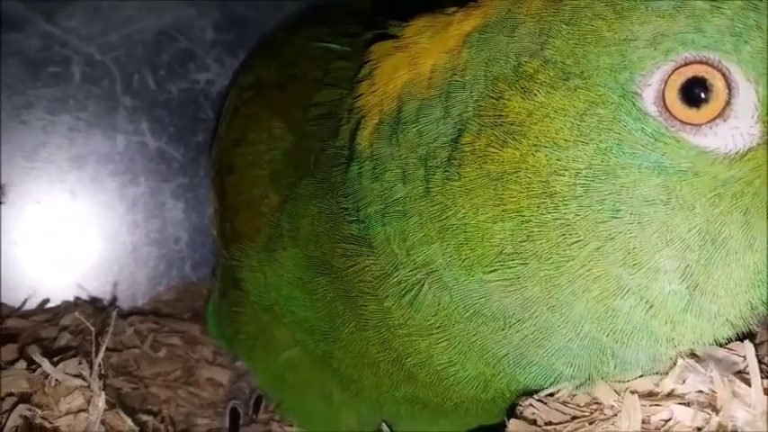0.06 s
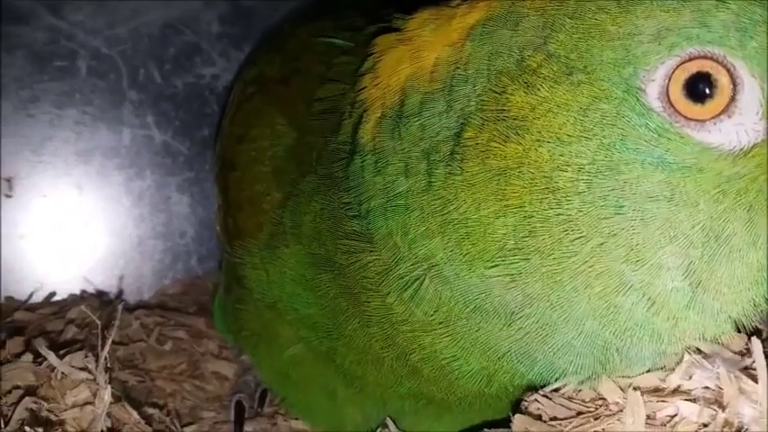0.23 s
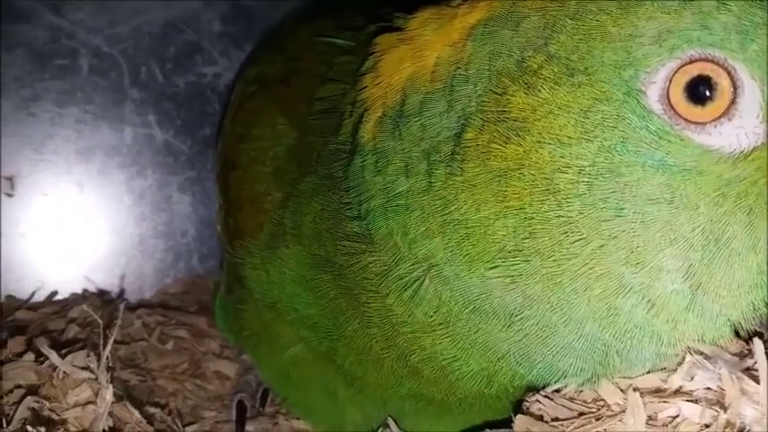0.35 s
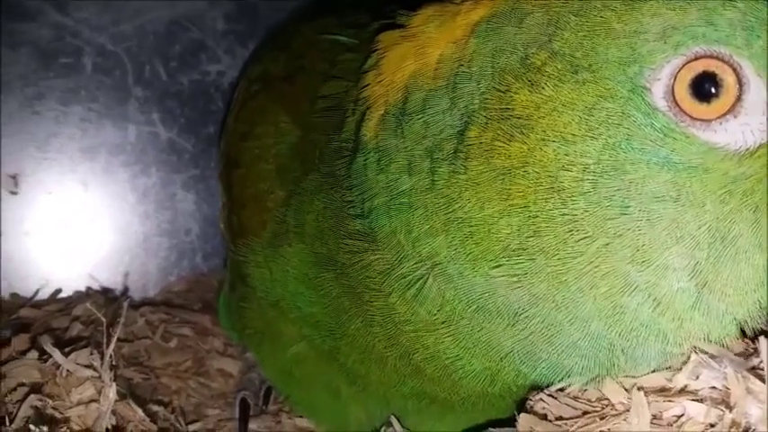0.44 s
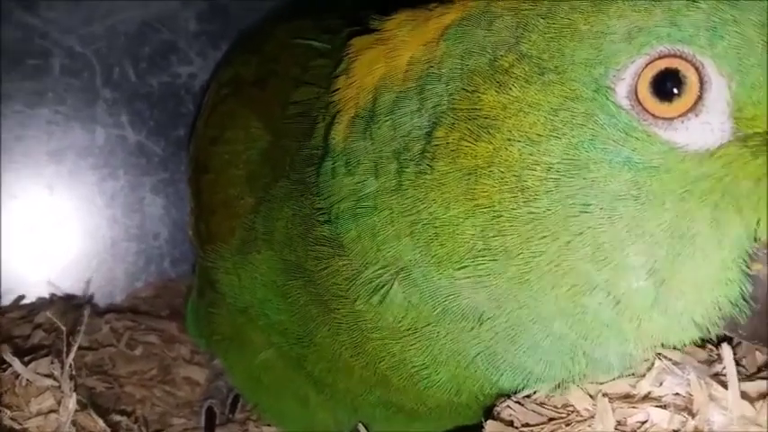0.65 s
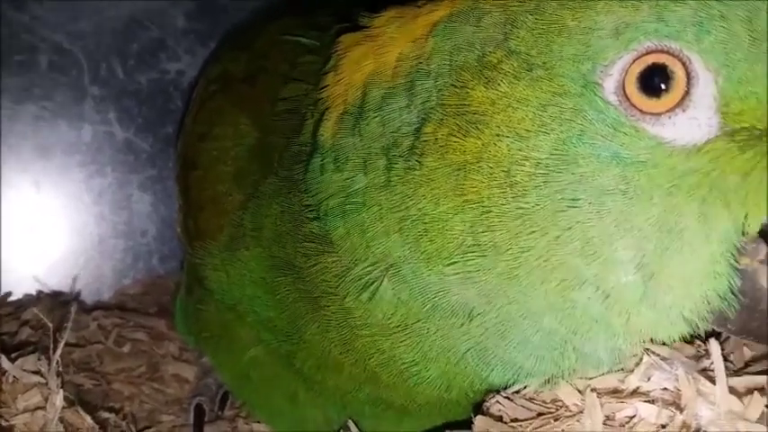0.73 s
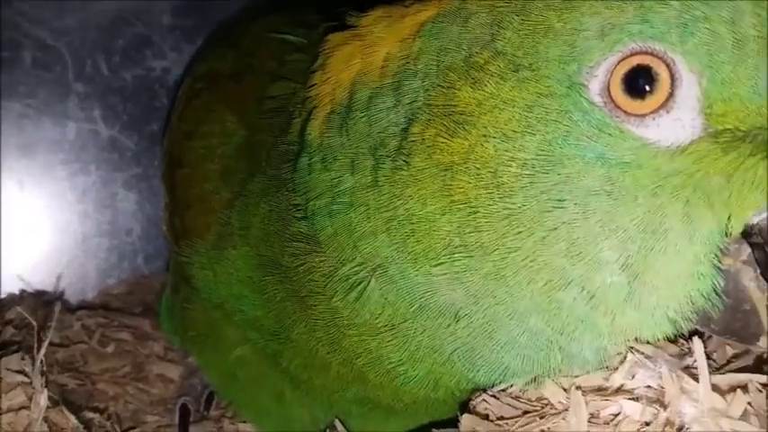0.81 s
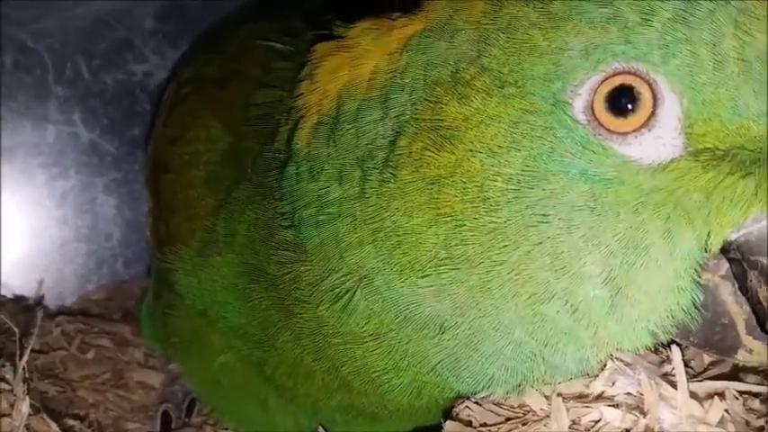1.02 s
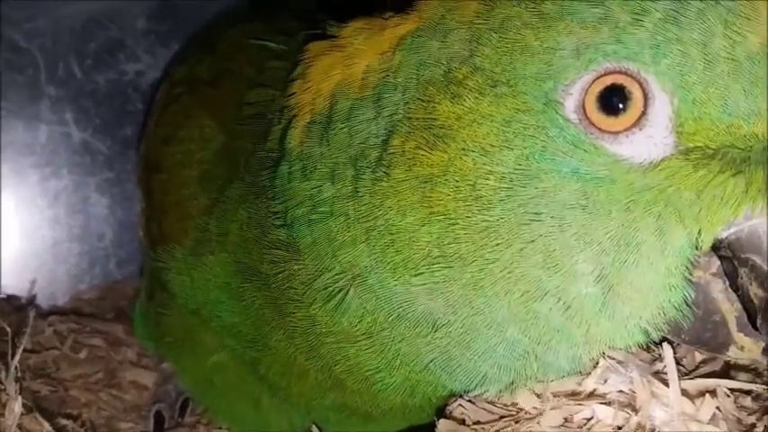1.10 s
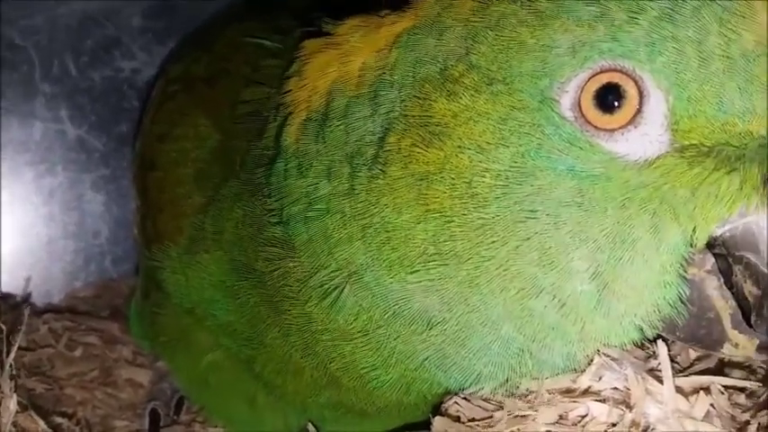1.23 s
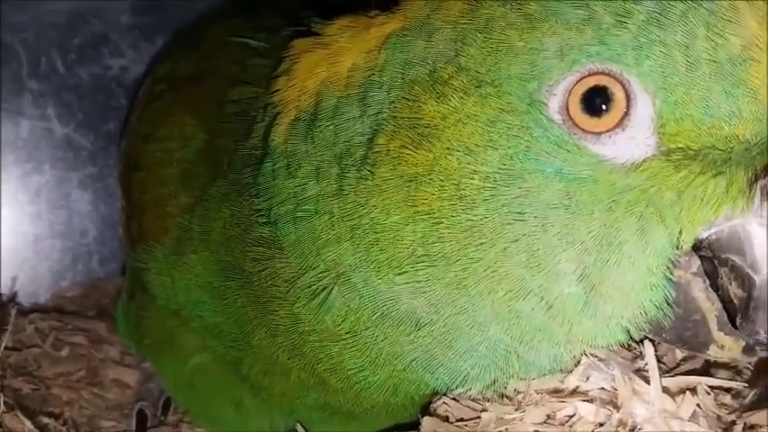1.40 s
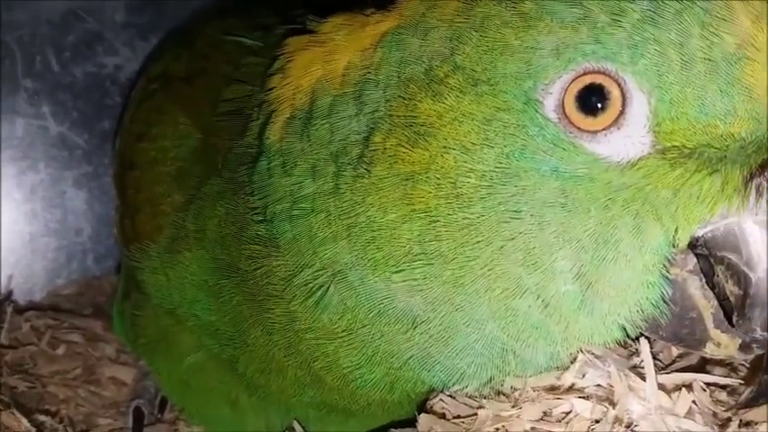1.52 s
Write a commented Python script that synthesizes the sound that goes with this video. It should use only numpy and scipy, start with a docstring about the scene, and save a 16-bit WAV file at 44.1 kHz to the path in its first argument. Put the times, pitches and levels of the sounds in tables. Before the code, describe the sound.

A parrot gives a short, rough, fluttering growl, then a puff and a rising wheezy breath.

```python
"""Parrot growling in a nest box

Close up, single throat pops run together into a fluttering, rough buzz: pulses from the syrinx
ring the bird's resonances and its small box. The growl ends in a puff of air, then the bird draws
a hissing breath and its narrowed airway whistles a rising wheeze.
The bedding ticks and rustles faintly over a low, wavering hum."""
import sys
import numpy as np
from scipy import signal
from scipy.fft import rfft, irfft, next_fast_len
from scipy.io import wavfile
from scipy.ndimage import map_coordinates

SR = 44100
rng = np.random.default_rng(int(sys.argv[2]) if len(sys.argv) > 2 else 0)


def persist_wave(psi):
    """Save psi, clipped to +-1, as 16-bit WAV."""
    counts = np.round(np.clip(psi, -1, 1) * 32767).astype(np.int16)
    wavfile.write(sys.argv[1], SR, np.atleast_2d(counts).T)


N = 68355

# Pan of the ambience and of the outgoing air. Each row: frequency in Hz, left over right in dB.
ROOM_PAN = [(100, 6.5), (600, -1), (2000, -9), (7000, 6), (13000, -1.5)]
PUFF_PAN = [(400, -3.5), (1000, -1), (2200, -5.5), (4000, 0), (8000, 3)]
# Stereo width of the ambience. Each row: frequency in Hz, left-right correlation.
ROOM_CORRELATION = [(100, 0.94), (600, 0.59), (2000, 0.17), (6000, 0.12)]
INHALE_LAG_S = .00027


def amp(db):
    """Decibels to gain."""
    return 10 ** (np.asarray(db) / 20)


def unit(x):
    """Scale to rms 1."""
    return x / np.sqrt(np.mean(x ** 2) + 1e-20)


def along(points, hz):
    """Read (Hz, value) points on a log frequency axis."""
    freqs, values = np.transpose(points)
    return np.interp(np.log(hz + 1), np.log(freqs + 1), values)


def clock():
    """Time of every sample in seconds."""
    return np.arange(N) / SR


def curves(rows):
    """An automation curve for each column after the time."""
    times, *columns = np.transpose(rows)
    return [np.interp(clock(), times, column) for column in columns]


def wobble(rate):
    """A smooth random curve with `rate` knots a second."""
    return map_coordinates(rng.standard_normal(int(N * rate / SR) + 4), [clock() * rate])


def filtered(x, response):
    """Filter x by a complex function of frequency."""
    size = 2 * next_fast_len(N)
    return irfft(rfft(x, size) * response(np.fft.rfftfreq(size, 1 / SR)), size)[..., :N]


def causal(points, hz):
    """Minimum-phase EQ response through (Hz, dB) points."""
    cepstrum = irfft(np.log(amp(along(points, hz))))
    half = len(cepstrum) // 2
    cepstrum[1:half] *= 2
    cepstrum[half + 1:] = 0
    return np.exp(rfft(cepstrum))


def resonate(x, modes, eq):
    """Ring parallel resonances of alternating polarity, then apply an EQ."""
    def response(f):
        bank = sum((-1) ** k * amp(db) * 1j * f * width / (hz * hz - f * f + 1j * f * width)
                   for k, (hz, width, db) in enumerate(modes))
        return bank * causal(eq, f)
    return filtered(x, response)


def place(x, pan, lag_s=0):
    """Pan by frequency, the left channel lag_s behind the right."""
    half = np.array([[.5], [-.5]])
    return filtered(x, lambda hz: amp(half * along(pan, hz)) * np.exp(-2j * np.pi * hz * half * lag_s))


def rush(colour, correlation):
    """Coloured stereo noise of rms 1, its width set by frequency."""
    def response(hz):
        angle = np.arccos(np.clip(along(correlation, hz), -1, 1)) / 2
        return amp(along(colour, hz)) * [np.cos(angle), np.sin(angle)]
    mid, side = filtered(rng.standard_normal((2, N)), response)
    return unit(np.array([mid + side, mid - side]))


def pulses(times, sizes):
    """Sharp windowed-sinc pulses, timed between samples."""
    at = np.asarray(times)[:, None] * SR
    taps = np.floor(at).astype(int) + np.arange(-7, 9)
    shapes = np.sinc(taps - at) * np.sinc((taps - at) / 8) * np.asarray(sizes)[:, None]
    return np.bincount(np.clip(taps, 0, N - 1).ravel(), shapes.ravel(), N)


def background():
    """A low hum wavers over a quiet bed of noise."""
    # Course of the hum. Each row: time in seconds, pitch in Hz, level in dB.
    course = [(0.0, 109.4, -35), (0.232, 108.4, -40.5), (0.378, 120.2, -60), (0.426, 116.4, -43.5),
              (0.482, 110.4, -42), (0.742, 111.7, -37), (1.056, 111.9, -43), (1.164, 120, -45),
              (1.194, 115.1, -54.5), (1.442, 116.8, -43.5), (1.506, 108.1, -69), (1.55, 107.7, -39)]
    # Its partials. Each row: harmonic number, relative level in dB.
    partials = [(1, -1), (2, -23.5)]
    # Colour of the noise bed. Each row: frequency in Hz, relative level in dB.
    bed_colour = [(25, -18), (55, -4), (85, 8), (140, 9), (220, 0), (750, -3.5), (1150, -16), (2100, -17),
                  (3800, -40), (15000, -37)]
    hz, db = curves(course)
    phase = 2 * np.pi * np.cumsum(hz) / SR
    hum = np.sqrt(2) * amp(db) * sum(amp(level) * np.sin(k * phase) for k, level in partials)
    bed = amp(-48) * rush(bed_colour, ROOM_CORRELATION)
    return place(hum, pan=[(1, 4.5)]) + place(bed, ROOM_PAN)


def bedding():
    """Wood chips tick and rustle under the bird."""
    # Chip ticks. Each row: start in seconds, level in dB, left over right in dB.
    ticks = [(1.2947, -37, 5), (1.3301, -49, 4), (1.3601, -50, 4), (1.3635, -53, 4), (1.3875, -53, 4),
             (1.395, -56, 4), (1.4514, -48, 4), (1.483, -55, 3)]
    # Soft shifts of the chips. Each row: centre in seconds, half width in seconds, level in dB.
    shifts = [(0.801, 0.05, -67), (1.259, 0.04, -58.5), (1.5, 0.082, -68)]
    # Colours of both. Each row: frequency in Hz, relative level in dB.
    tick_colour = [(1000, -33), (4000, -9), (7000, -13.5), (10000, -16.5), (13000, -11), (15500, -4.5)]
    rustle_colour = [(2000, -8), (5000, -2.5), (7500, -3), (10000, -16.5), (13000, -8.5), (15500, -6.5)]
    t60_s, grain_db = .005, 2.5
    t = clock()
    half = np.array([[.5], [-.5]])
    decays = sum(amp(db + half * pan - 60 * np.abs(t - start) / t60_s) * (t >= start)
                 for start, db, pan in ticks)
    swells = sum(amp(db) * np.exp(-((t - centre) / width) ** 2) for centre, width, db in shifts)
    grains = unit(amp(grain_db * wobble(rate=400)) * rush(rustle_colour, ROOM_CORRELATION))
    return decays * rush(tick_colour, ROOM_CORRELATION) + place(swells * grains, ROOM_PAN)


def breath():
    """Air rushes through the parrot's throat and beak, out and in."""
    # Airflow of a fading breath, the puff, the inhale and the start of the next breath.
    # Each row: time in seconds, level in dB.
    first_flow = [(0, -38.5), (.055, -42.5), (.10, -55.5), (.2, -66), (.25, -100)]
    puff_flow = [(.33, -76), (.39, -55), (.48, -43), (.55, -35.5), (.595, -34.5), (.63, -38.5),
                 (.67, -47.5), (.73, -58.5), (.85, -75)]
    inhale_flow = [(.86, -80), (.93, -58), (.98, -52), (1.08, -45), (1.15, -39.5), (1.19, -42),
                   (1.235, -34.5), (1.27, -41), (1.30, -48), (1.42, -97)]
    last_flow = [(1.38, -86), (1.42, -100), (1.48, -63), (1.55, -49)]
    # Colours of the air. Each row: frequency in Hz, relative level in dB.
    soft_colour = [(200, -36), (400, -7), (750, 4.5), (1100, -5), (1700, -5.5), (2500, -21.5), (4300, -35),
                   (12000, -62)]
    puff_colour = [(200, -2), (400, -6.5), (700, 3), (1100, -1.5), (1750, -3.5), (2140, -3), (2400, -6),
                   (3100, -12), (3800, -10.5), (4400, -27.5), (6500, -27.5), (8000, -26), (11000, -47.5),
                   (15000, -50.5)]
    inhale_colour = [(250, -41), (400, -17), (520, 3.5), (750, 0.5), (1050, 1.5), (1270, -6.5), (1600, 2),
                     (2000, -9.5), (2400, -15.5), (3400, -8.5), (4500, -24), (5500, -43.5), (10000, -67.5),
                     (15000, -50.5)]
    # Stereo width of the air. Each row: frequency in Hz, left-right correlation.
    correlation = [(300, 1), (900, 0.81), (2000, 0)]
    # Pan of the inhale. Each row: frequency in Hz, left over right in dB.
    inhale_pan = [(300, -10.5), (600, 11), (1020, -4.5), (1790, -4.5), (3150, -2), (4500, 4)]
    flow = lambda rows: amp(curves(rows)[0])
    puff = flow(puff_flow) * rush(puff_colour, correlation)
    inhale = flow(inhale_flow) * rush(inhale_colour, correlation)
    soft = (flow(first_flow) + flow(last_flow)) * rush(soft_colour, correlation)
    return place(puff + soft, PUFF_PAN) + place(inhale, inhale_pan, INHALE_LAG_S)


def wheeze():
    """The narrowed airway whistles, reedy as it rises, purer on a faltering held note."""
    # The whistle. Each row: time in seconds, pitch in Hz, fundamental in dB, overtones in dB.
    course = [(.92, 400, -62, -66), (.98, 443, -49, -37), (1.005, 480, -55, -47), (1.025, 502, -42, -39),
              (1.066, 532, -43, -35), (1.074, 600, -53, -50), (1.084, 680, -42, -44),
              (1.113, 730, -44, -33), (1.138, 745, -52, -42), (1.149, 760, -33, -39),
              (1.165, 772, -46, -38), (1.183, 784, -30, -33), (1.208, 794, -29, -42), (1.23, 792, -45, -44),
              (1.25, 780, -32, -35), (1.273, 792, -30, -39), (1.286, 790, -42, -40), (1.308, 780, -48, -44),
              (1.335, 785, -55, -66), (1.40, 785, -64, -85)]
    # Trim of each partial in dB, from the fundamental up.
    trims = [-.5, -12.5, -16, -22.5, -27]
    # Colour of the beak. Each row: frequency in Hz, gain in dB.
    beak_eq = [(700, 1), (1200, -6), (1550, 1), (3200, -3)]
    flicker_db, fuzz_rad = 2, .42
    t = clock()
    hz, db, overtone_db = curves(course)
    wander = .01 * amp(np.minimum(-42 - db, 10))  # the quieter the note, the less steady its pitch
    phase = 2 * np.pi * np.cumsum(hz * (1 + wander * wobble(rate=250))) / SR
    tone = np.zeros(N)
    for k, trim in enumerate(trims):
        gain = amp((overtone_db if k else db) + trim + flicker_db * wobble(rate=120))
        fuzz = np.sqrt(k) * fuzz_rad * wobble(rate=150)
        tone += gain * np.sin((k + 1) * phase + fuzz)
    gate = (t > course[0][0]) & (t < course[-1][0])
    whistle = filtered(np.sqrt(2) * tone * gate, lambda f: amp(along(beak_eq, f)))
    return place(whistle, pan=[(1, -11.5)], lag_s=INHALE_LAG_S)


def puff_rings():
    """As the growl lets go, the escaping air briefly sounds narrow, unsteady resonances."""
    # The rings. Each row: centre in seconds, half width in seconds, pitch in Hz, level in dB.
    rings = [(.592, .024, 2140, -38), (.606, .02, 1870, -40), (.61, .035, 3680, -50)]
    flicker_db = 2.5
    t = clock()
    sound = np.zeros(N)
    for centre, width, hz, db in rings:
        swell = amp(db + flicker_db * wobble(rate=150)) * np.exp(-((t - centre) / width) ** 2)
        sound += swell * np.sin(2 * np.pi * hz * t + wobble(rate=150))
    return place(sound, PUFF_PAN)


def flutter():
    """The growl comes in short surges: three drive envelopes, two textures and where it is active."""
    # Surges. Each row: start in seconds, length in seconds, drive of the hollow, the throat and
    # the rasp in dB, period doubling from 0 to 1, roughness from 0 to 1.
    surges = [(0.293, 0.016, -29.5, -35.5, -49, 0.08, 0.4), (0.308, 0.016, -30, -24.5, -36, 0.56, 0.9),
              (0.319, 0.015, -27, -38, -41, 0.85, 0.5), (0.343, 0.018, -48.5, -22.5, -36.5, 0.25, 0.2),
              (0.363, 0.012, -43, -27.5, -43, 0.1, 0.2), (0.379, 0.014, -26.5, -21, -32.5, 0.7, 0.8),
              (0.391, 0.031, -24, -24.5, -31.5, 0.8, 0.88), (0.423, 0.015, -33, -28, -46.5, 1, 0.9),
              (0.449, 0.012, -20, -24.5, -36, 0.6, 0.7), (0.47, 0.022, -32, -23, -39.5, 0.9, 1),
              (0.481, 0.012, -20.5, -45.5, -33, 1, 0.1), (0.494, 0.039, -34.5, -20, -26, 0.9, 0.31),
              (0.537, 0.027, -32.5, -19, -26, 0.83, 0.4), (0.567, 0.02, -22, -26.5, -32.5, 0.88, 0.65)]
    attack_s, release_s = .007, .012
    t = clock()
    start, length, *columns = np.transpose(surges)[:, :, None]
    attack = np.clip((t - start) / attack_s + .5, 0, 1)
    release = np.clip((start + length - t) / release_s + .5, 0, 1)
    gates = attack * release
    overlap = gates.sum(0) + 1e-9
    drives = [(gates * amp(db)).sum(0) / np.maximum(overlap, 1) for db in columns[:3]]
    textures = [np.clip((gates * amount).sum(0) / overlap, 0, 1) for amount in columns[3:]]
    return drives, textures, overlap > .5


def syrinx(doubling, roughness):
    """A rough, airy pulse train, and a clean one an octave down as a level reference."""
    # Pitch of the syrinx. Each row: time in seconds, pitch in Hz.
    pitch = [(.30, 390), (.314, 560), (.33, 710), (.341, 520), (.349, 660), (.36, 570), (.369, 380),
             (.379, 610), (.388, 680), (.405, 580), (.418, 665), (.445, 490), (.456, 560), (.465, 530),
             (.488, 645), (.498, 582), (.517, 554), (.53, 568), (.545, 616), (.563, 570), (.578, 622)]
    jitter, shimmer_db, air_share = .08, 3.5, .12  # at full roughness
    t = clock()
    hz, = curves(pitch)
    cycles = np.cumsum(hz) / SR
    index = np.arange(1, int(cycles[-1]))
    times = np.interp(index, cycles, t)
    odd = index % 2
    time_scatter, size_scatter = rng.standard_normal((len(times), 2)).T * np.interp(times, t, roughness)
    # Period doubling weakens every second pulse and so adds the octave below.
    weakening = np.interp(times, t, doubling)
    sizes = amp(shimmer_db * size_scatter) * (1 - weakening * odd) / (2 - weakening)
    train = pulses(times + jitter * time_scatter / hz.mean(), sizes)
    clean = pulses(times, odd)
    turbulence = unit(np.cos(np.pi * cycles / 2) ** 2 * rng.standard_normal(N))
    return train + air_share * roughness * clean.std() * turbulence, clean


def growl():
    """Single pops, then surges of syrinx pulses, ring the hollow, the throat, the rasp and the box."""
    # Throat pops. Each row: time in seconds, relative level in dB, brightness in dB.
    pops = [(0.1763, -31.5, 1.5), (.1792, -34, -4), (0.1854, -45.5, 15), (0.1871, -37, 10.5),
            (0.2015, -33.5, -2), (0.2058, -33, -4), (0.2111, -32.5, 1.5), (.214, -42.5, 10.5),
            (0.2403, -33, -4), (0.2437, -33, 3.5), (0.2708, -35, 4), (0.276, -29, 0.5), (0.2918, -32, 7)]
    # Resonances. Each row: centre in Hz, bandwidth in Hz, gain in dB.
    hollow_modes = [(350.2, 48, 0)]
    throat_modes = [(559.5, 79.6, 0)]
    rasp_modes = [(1150, 340, -2), (1470, 220, 3.5), (2050, 380, -8), (2470, 230, -7), (2950, 400, -12),
                  (5020, 280, -22)]
    box_modes = [(304, 8, -11)]
    # EQ for the low resonances, the rasp, its dull form and the soft pops.
    # Each row: frequency in Hz, gain in dB.
    body_eq = [(40, -70), (100, -19), (200, 10.5), (290, 24.5), (650, 8), (1000, 8.5), (3000, -46)]
    rasp_eq = [(60, -48), (300, -45), (900, 2.5), (1500, 9.5), (3200, 5), (4000, -17), (5000, 0),
               (6200, -17), (8000, -4), (11000, -38)]
    dull_eq = [(1200, 2), (3000, -8)]
    pop_eq = [(3300, 0), (4500, -14)]
    (hollow, throat, rasp), (doubling, roughness), active = flutter()
    train, clean = syrinx(doubling, roughness)
    pop_s, pop_db, bright_db = np.transpose(pops)

    def ring(modes, eq, drive, pop_levels):
        """Excite one set of resonances with the buzz and the pops."""
        soft_pops = filtered(pulses(pop_s, amp(pop_levels)), lambda f: causal(pop_eq, f))
        return resonate(drive + soft_pops, modes, eq) / resonate(clean, modes, eq)[active].std()

    opening = np.clip(rasp / amp(-28), 0, 1)  # weak surges are dull, strong ones open up
    dull = filtered(train * rasp * (1 - opening), lambda f: amp(along(dull_eq, f)))
    low = ring(hollow_modes, body_eq, train * hollow, pop_db - 13.5)
    middle = ring(throat_modes, body_eq, train * throat, pop_db + 4.5)
    high = ring(rasp_modes, rasp_eq, train * rasp * opening + dull, pop_db + bright_db - 9.5)
    voice = middle + high - low  # the hollow swings against the throat
    # Pan of the voice. Each row: frequency in Hz, left over right in dB.
    pan = [(330, 3.5), (600, 4), (1020, -3), (1790, -9), (3150, -5), (5000, 9)]
    return place(voice + resonate(voice, box_modes, eq=[(1, .0044)]), pan)


def box(x):
    """The close walls add a very short tail, different in each channel."""
    # Colour of the tail. Each row: frequency in Hz, gain in dB.
    wet_eq = [(300, -18), (700, -9), (1500, -11), (4000, -6)]
    t60_s = .08
    t = np.arange(SR // 10) / SR
    tail = rng.standard_normal((2, len(t))) * amp(-60 * t / t60_s)
    wet = signal.fftconvolve(x, tail / np.linalg.norm(tail[0]), axes=1)[:, :N]
    return x + filtered(wet, lambda hz: causal(wet_eq, hz))


def scene():
    """The bird in its box, with bedding and background."""
    return box(growl() + puff_rings()) + wheeze() + breath() + bedding() + background()


def record(dry):
    """A brick-wall low-pass at 16 kHz."""
    return filtered(dry, lambda hz: hz < 16000)


dry = scene()
out = record(dry)
persist_wave(out)
```